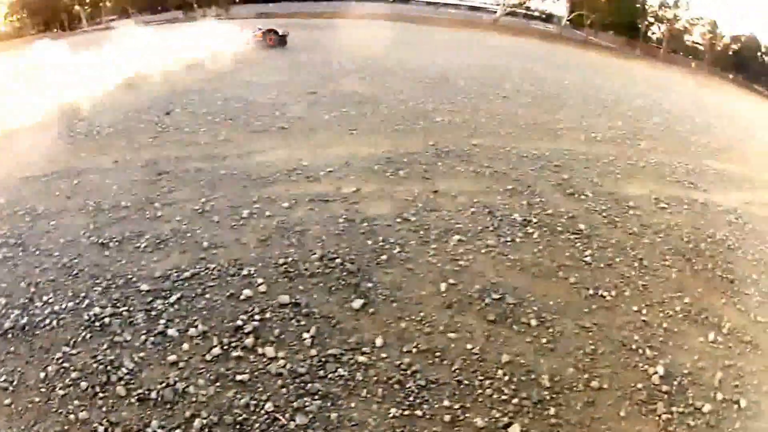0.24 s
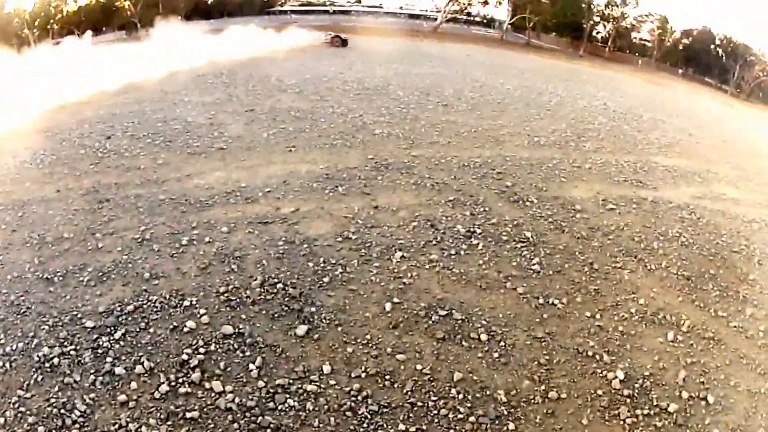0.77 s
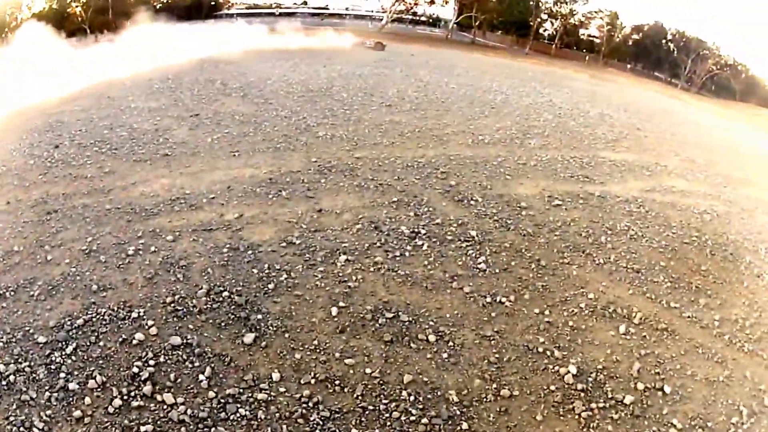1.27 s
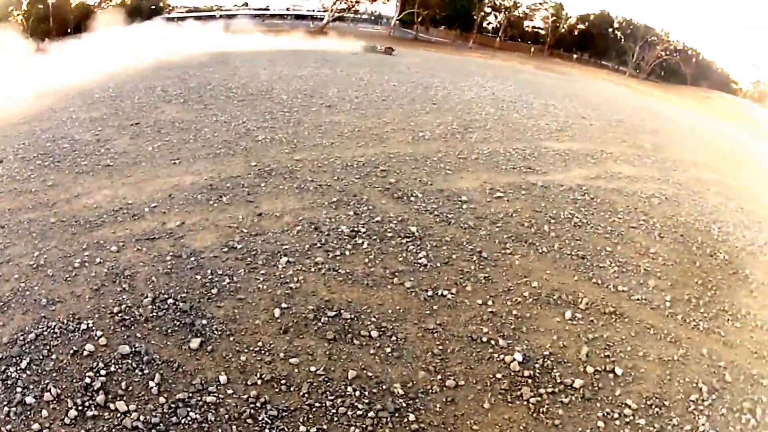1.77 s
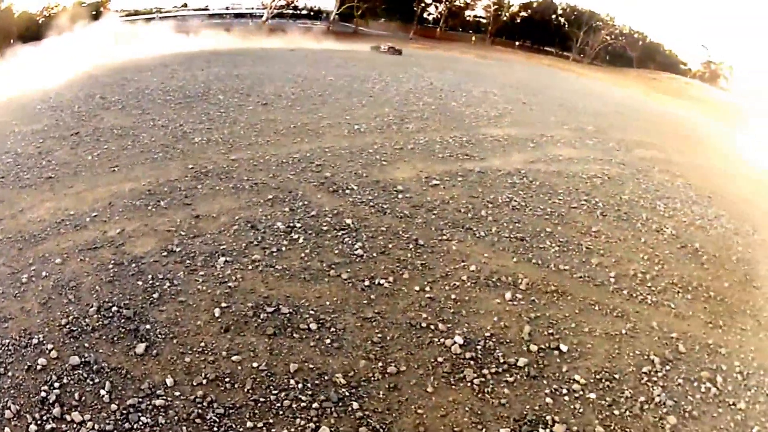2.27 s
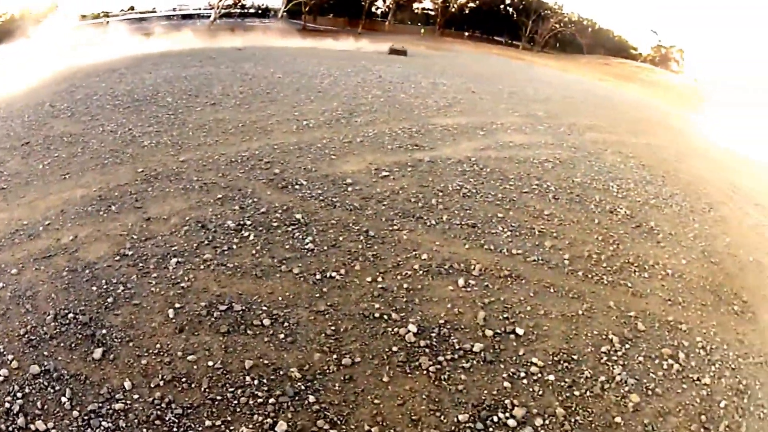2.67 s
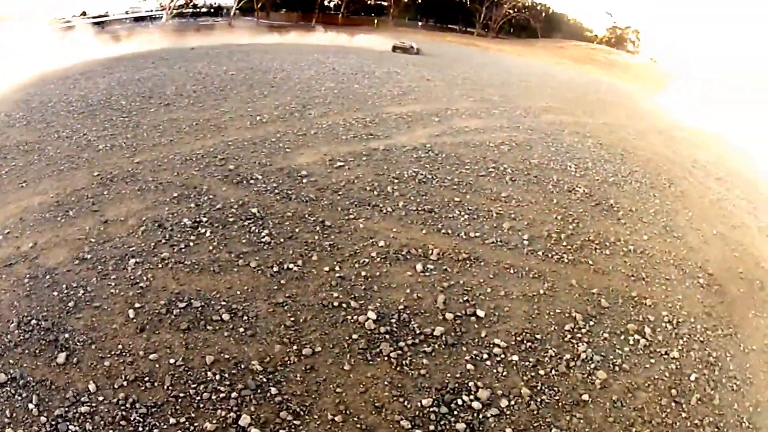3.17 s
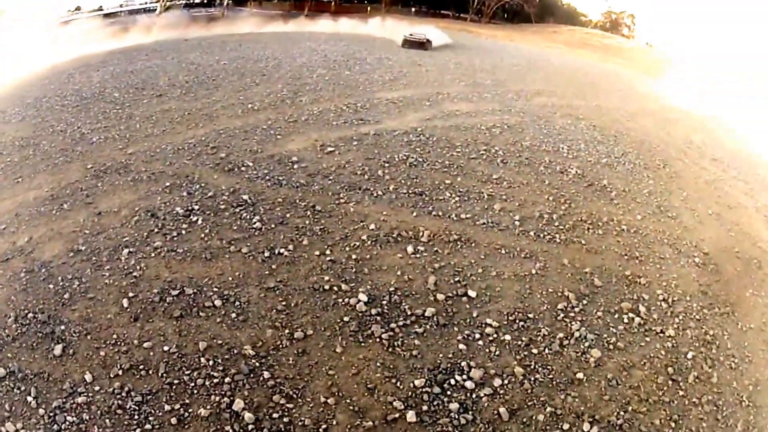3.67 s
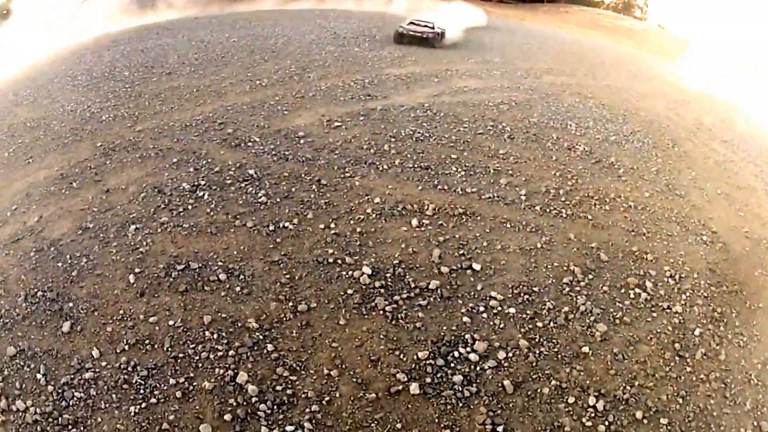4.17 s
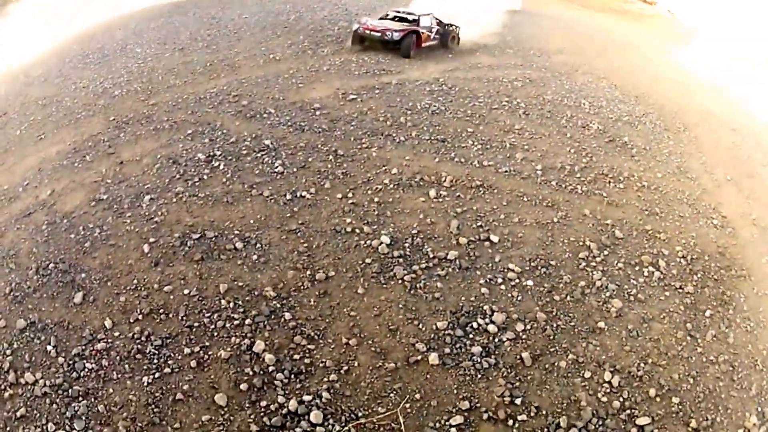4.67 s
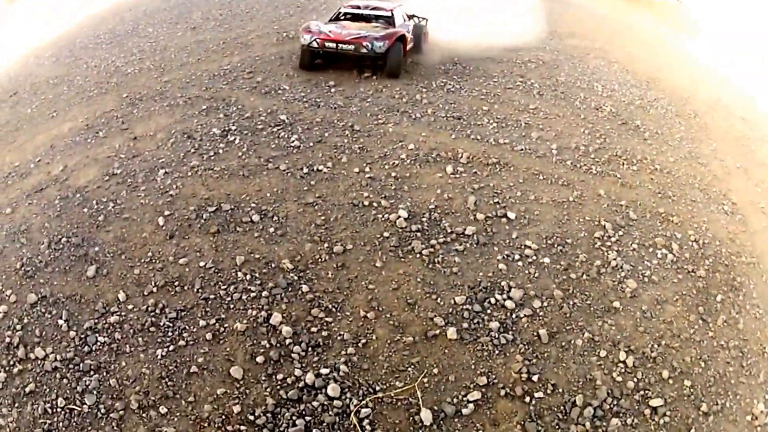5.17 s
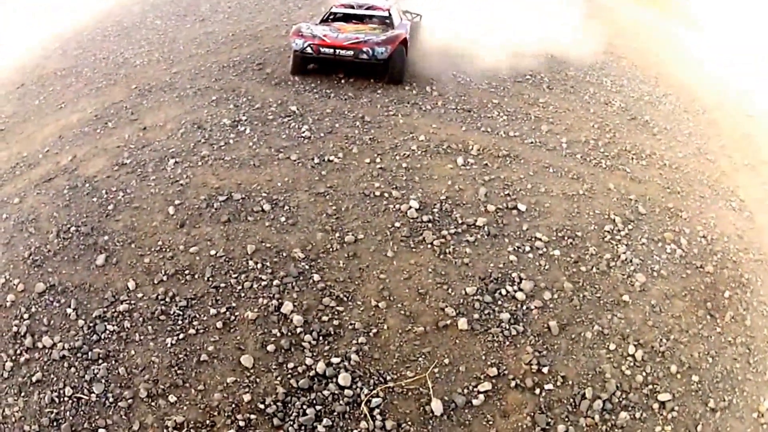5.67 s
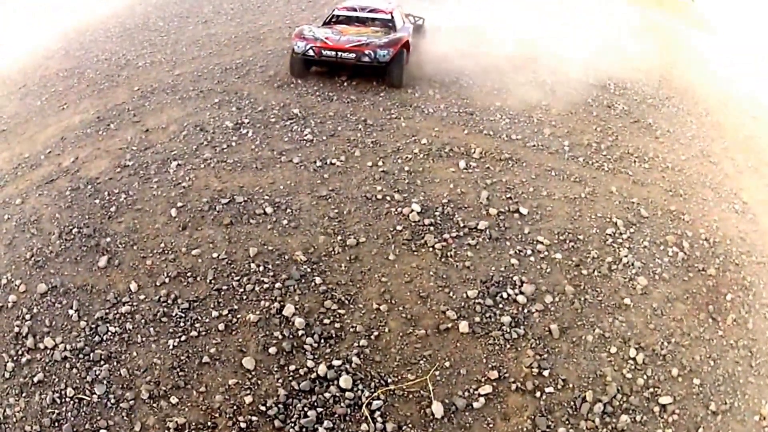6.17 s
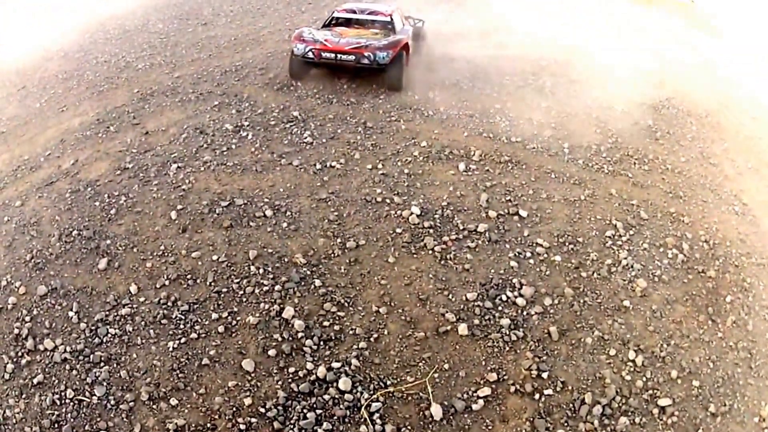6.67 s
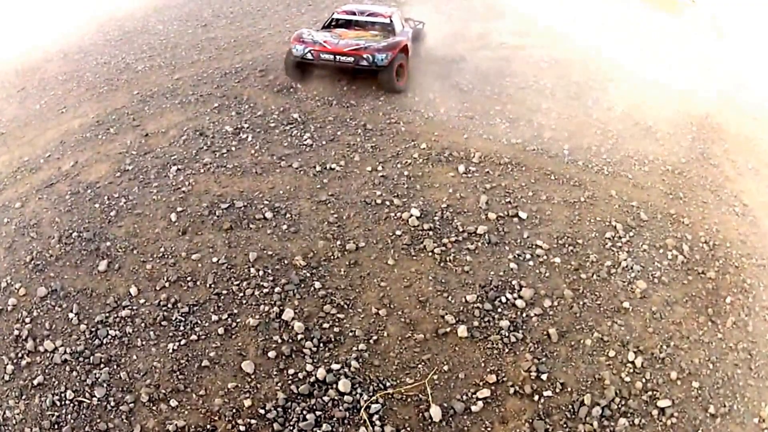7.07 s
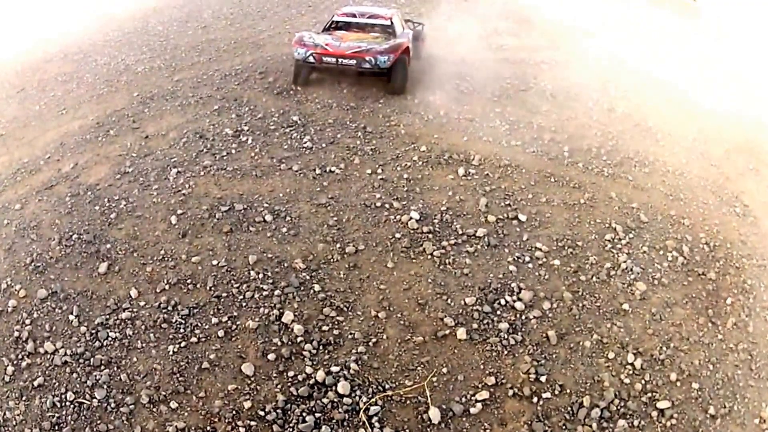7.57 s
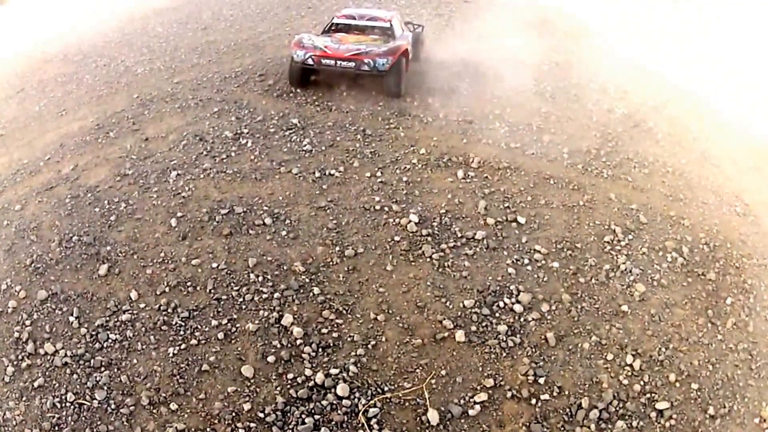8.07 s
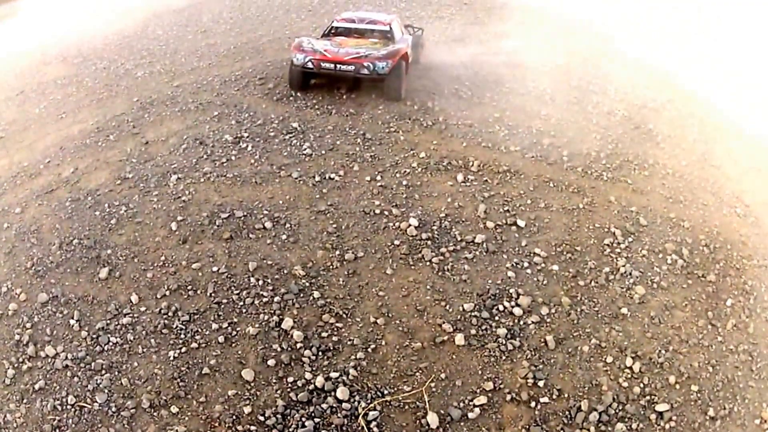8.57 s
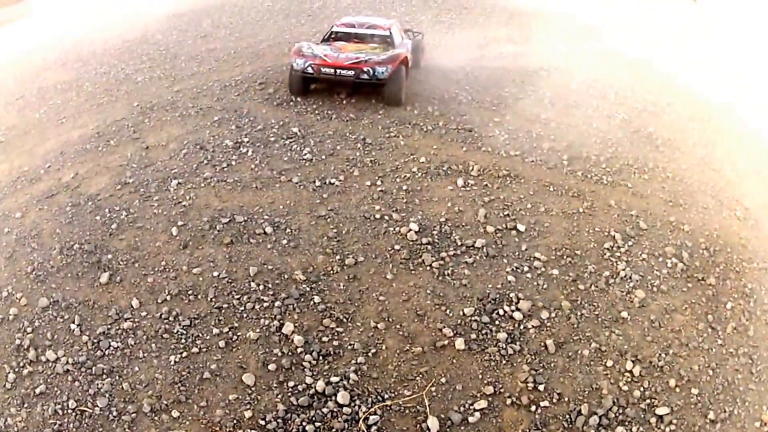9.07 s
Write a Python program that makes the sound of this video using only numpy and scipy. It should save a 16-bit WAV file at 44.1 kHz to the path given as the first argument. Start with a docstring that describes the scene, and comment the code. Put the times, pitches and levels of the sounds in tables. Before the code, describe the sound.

The small two-stroke engine of a radio-controlled truck screams at high revs from the start, close by, its tyres spraying gravel. At about 0.9 seconds the throttle shuts and the pitch falls as it coasts; a stone clinks at 1.3. Around 1.6 seconds the engine pulls again, labouring at first, then rising at about 2.4 into a wavering, raspy buzz, lower than the opening scream. Metal and gears whine, grit hisses in spurts and the frame drums softly.

At about 4 seconds the engine runs down, with another clink and a spray of grit near 4.5. From roughly 5.4 seconds to the end, just past 9, it holds a lumpy, burbling idle, with harder pops around 6.4 and 6.8, a stone clink at 7.1 and a small hiss of grit at 7.4. A thin, high sizzle colours the sound throughout, over a very faint rumble of air.

```python
"""On gravel, within arm's length of a radio-controlled truck with a two-stroke engine.
It screams, coasts, pulls again, then runs down to a lumpy idle that fires every other turn.
Each crank turn sends a pressure pulse into the resonant exhaust; the intake rasps, metal and gears
whine, the tyres spray grit, the frame drums and stones clink over a faint rumble of air.
A slow sample-and-hold mirrors the whole spectrum into a thin, high sizzle."""
import sys
import numpy as np
from scipy import signal
from scipy.fft import rfft, irfft, next_fast_len
from scipy.io import wavfile
from scipy.ndimage import uniform_filter1d, minimum_filter1d, map_coordinates

SR = 44100
rng = np.random.default_rng(int(sys.argv[2]) if len(sys.argv) > 2 else 0)


def transcribe(u):
    """Save the signal u as a 16-bit wav file named by the first command-line argument.

    u: samples, shape (n,) or (channels, n), limited to [-1, 1]; the rate is SR.
    q: integer samples, one column per channel.
    """
    v = np.clip(np.atleast_2d(u).T, -1, 1)
    q = np.round(v * 32767).astype(np.int16)
    wavfile.write(sys.argv[1], SR, q)


N = 411453
TIME = np.arange(N) / SR


def amp(db):
    """Amplitude ratio of a level in decibels."""
    return np.exp(np.asarray(db) * (np.log(10) / 20))


def unit(x):
    """Normalisation to an overall rms of 1."""
    return x / np.sqrt(np.mean(x ** 2) + 1e-20)


def steady(x, size=4096):
    """Normalisation to a running rms of 1."""
    power = uniform_filter1d(uniform_filter1d(x * x, size), size // 2)
    return x / np.sqrt(np.abs(power) + 1e-14)


def ramp(x, lo, hi):
    """Linear rise from 0 at lo to 1 at hi."""
    return np.clip((x - lo) / (hi - lo), 0, 1)


def blend(a, b, share):
    """Linear cross-fade from a to b."""
    return a + share * (b - a)


def curve(rows):
    """Linear interpolation of (time_s, value) rows at every sample."""
    return np.interp(TIME, *np.transpose(rows))


def wobble(rate_hz):
    """Slow random modulation: a spline through rate_hz Gaussian knots a second."""
    knots = rng.standard_normal(int(N * rate_hz / SR) + 4)
    coarse = np.arange(0, N, 64)
    return np.interp(np.arange(N), coarse, map_coordinates(knots, [coarse * rate_hz / SR]))


def pulses(at, sizes):
    """Impulse train, each impulse shared between the two samples round its position."""
    whole, part = at.astype(int), at % 1
    before = np.bincount(whole, sizes * (1 - part), N + 2)
    after = np.bincount(whole + 1, sizes * part, N + 2)
    return (before + after)[:N]


def ring(x, spectrum, size=4096):
    """Resonance: a minimum-phase filter through (frequency_hz, gain_db) points, falling off outside."""
    hz = np.fft.rfftfreq(size, 1 / SR) + 1
    points_hz, points_db = np.transpose(spectrum)
    beyond = np.abs(np.log(hz / np.clip(hz, points_hz[0], points_hz[-1])))
    gain = amp(np.interp(np.log(hz), np.log(points_hz), points_db) - 20 * beyond)
    cepstrum = irfft(np.log(gain + 1e-6))
    cepstrum[1:size // 2] *= 2  # folding the cepstrum makes the response causal
    cepstrum[size // 2 + 1:] = 0
    impulse_response = irfft(np.exp(rfft(cepstrum)))
    return signal.oaconvolve(np.float32(x), np.float32(impulse_response))[:N]


def filtered(x, response):
    """Filtering as multiplication of the spectrum by a function of frequency."""
    size = next_fast_len(N + SR // 10, True)
    gain = np.complex64(response(np.fft.rfftfreq(size, 1 / SR)))
    return irfft(rfft(np.float32(x), size) * gain, size)[:N]


# Bursts of throttle, each with the coast after it; the last four columns are level offsets:
# open_s, shut_s, closing_s, rest_hz, drag_hz, shut_exhaust_db, rasp_and_gears_db, gravel_db, chassis_db
THROTTLE_BURSTS = [(-.5, .905, 0.11, 80.5, 135, -5.5, -8, -2, 0.5),
                   (1.645, 3.953, 0.057, 64.53, 180.4, 1, 0.5, -0.5, 3)]


def throttle_opening(opening_s=0.019, lead_s=0.017):
    """Throttling, 0 shut to 1 open: the valve snaps open and starts to shut just before the speed drops."""
    return sum(ramp(TIME - open_s, 0, opening_s) * (1 - ramp(TIME - shut_s + lead_s, 0, closing_s))
               for open_s, shut_s, closing_s, *_ in THROTTLE_BURSTS)


def burst_db(layer, smoothing=2000):
    """Level offset of one layer in the latest burst, smoothed by a moving average."""
    rows = np.array(THROTTLE_BURSTS)
    column = 5 + ["shut_exhaust", "rasp_and_gears", "gravel", "chassis"].index(layer)
    latest = np.searchsorted(rows[:, 0], TIME) - 1
    return uniform_filter1d(rows[latest, column], smoothing)


def run_down(from_hz, rest_hz, drag_hz, t, friction_s=0.426):
    """Deceleration by linear friction and quadratic drag, which are equal at drag_hz above rest_hz."""
    excess_hz = from_hz - rest_hz
    decay = np.exp(-np.maximum(t, 0) / friction_s)
    return rest_hz + excess_hz * decay / (1 + excess_hz / drag_hz * (1 - decay))


# Crankshaft speed in the first burst, in the second and at idle: time_s, speed_hz
CRANK_SCREAMING = [(0.0, 241.6), (0.076, 237), (0.132, 240.0), (0.212, 237.2), (0.224, 240.8), (0.35, 248),
                   (0.47, 229.3), (0.492, 222.4), (0.608, 220.3), (0.642, 227.9), (0.724, 224.1),
                   (0.92, 238.5)]
CRANK_PULLING = [(1.82, 158.9), (2.11, 158.6), (2.24, 165.8), (2.34, 168.3), (2.5, 185.7), (2.53, 177.7),
                 (2.7, 186.6), (2.78, 180.3), (2.82, 185.3), (3.28, 182.9), (3.32, 184.4), (3.39, 189.7),
                 (3.49, 180), (3.56, 181.6), (3.64, 189.7), (3.76, 179.8), (3.79, 187.6), (3.94, 188.6)]
CRANK_IDLING = [(5.4, 65.03), (5.66, 62.6), (6.2, 64.38), (6.99, 64.17), (7.39, 64.94), (7.56, 63.37),
                (7.77, 61.93), (8.03, 59.55), (8.26, 61.78), (8.46, 59.0), (8.66, 61.8), (8.88, 60.56),
                (8.97, 63.1), (9.33, 65.2)]


def crankshaft(spin_up_s=0.18, idle_from_s=5.3, settle_s=0.106, flutter=0.0014, slip=0.00592,
               bounce=0.006):
    """Rotation rate in Hz sets the fundamental; wheel slip and bounce modulate its frequency."""
    speed = idle = curve(CRANK_IDLING)
    for burst, loaded in zip(THROTTLE_BURSTS, (CRANK_SCREAMING, CRANK_PULLING)):
        open_s, shut_s, _, rest_hz, drag_hz, *_ = burst
        spin_up = np.sin(np.pi / 2 * ramp(TIME - open_s, 0, spin_up_s)) ** 2
        speed = blend(speed, curve(loaded), spin_up)
        coasting = run_down(speed[int(shut_s * SR)], rest_hz, drag_hz, TIME - shut_s)
        speed = np.where(TIME < shut_s, speed, coasting)
    speed = blend(speed, idle, ramp(TIME - idle_from_s, 0, settle_s))
    racing = ramp(speed, 157.4, 185)
    return speed * (1 + (flutter + slip * racing) * wobble(45) + bounce * racing * wobble(22))


def strokes(speed, turns, scatter_db=0.37, jitter_s=6e-6, idle_jitter_s=8e-5, max_turns=2000):
    """Cyclic variation: sample position and size of each turn's puff; slow turns come less evenly."""
    at = np.interp(np.arange(1, int(turns[-1])), turns, np.arange(N))
    timing, strength = rng.standard_normal((max_turns, 2))[:len(at)].T
    uneven_s = jitter_s + idle_jitter_s * (1 - ramp(speed[at.astype(int)], 83, 120))
    return np.clip(at + uneven_s * SR * timing, 0, N - 1), amp(scatter_db * strength)


def on_pipe(speed, lo_hz=165, hi_hz=177):
    """Pipe tuning: 0 while the engine labours, 1 once it is fast enough for the tuned pipe to work."""
    return ramp(speed, lo_hz, hi_hz)


# Spectrum of one exhaust pulse under load, from low speed to high: frequency_hz, gain_db
PULLING_PULSE = [(100, -11.5), (160, -10.5), (320, 0), (470, 2.5), (630, 8.5), (690, -1), (780, -18.5),
                 (840, -10.5), (950, -18.5), (1100, -21), (1260, -15), (1430, -42.5), (1600, -32),
                 (1800, -46), (2100, -24.5), (3000, -48)]
ON_PIPE_PULSE = [(100, -38), (183, 13.5), (370, 23), (520, 15.5), (580, 27), (750, 19), (950, 14.5),
                 (1080, -16.5), (1280, -12.5), (1470, -10), (1700, -27), (2550, -40), (3200, -51),
                 (5500, -58.5)]
SCREAMING_PULSE = [(120, -39), (225, -9.5), (440, 5.5), (495, 4), (660, 1), (725, -18), (880, -26),
                   (970, -17.5), (1100, -26), (1200, -12.5), (1380, -33.5), (1680, -35), (2080, -39),
                   (2400, -41), (4500, -52)]


def open_exhaust(speed, puffs, pulling_db=-12.5, screaming_db=-11):
    """Source and filter: under load the puffs excite pipe resonances that change with engine speed."""
    pull, pipe, scream = [steady(ring(puffs, spectrum))
                          for spectrum in (PULLING_PULSE, ON_PIPE_PULSE, SCREAMING_PULSE)]
    screaming = ramp(speed, 198, 213)
    tone = blend(blend(pull, pipe, on_pipe(speed)), scream, screaming)
    return amp(blend(pulling_db, screaming_db, screaming)) * steady(tone)


# Spectrum of piston and intake noise: frequency_hz, gain_db
INTAKE_SPECTRUM = [(500, -19), (900, 13), (1180, -33), (1420, 4), (1800, 1), (2300, 3), (2650, -2),
                   (3000, -2.5), (3300, -14.5), (3750, -9), (4150, -20), (5200, -15), (6000, -54.5)]


def rasp(speed, wheels, turns, throttle, puffs, base_db=-47, engine_db_per_hz=0.0421,
         wheel_db_per_hz=0.0539, labouring_db=-12, on_pipe_db=-5.5):
    """Amplitude modulation: piston and intake noise swells once a turn, and under load becomes a buzz."""
    swell = 1 + 0.12 * np.cos(2 * np.pi * (turns - 0.15))
    noise = unit(ring(swell * rng.standard_normal(N), INTAKE_SPECTRUM))
    buzz = steady(ring(-puffs, INTAKE_SPECTRUM))  # the intake sucks as the exhaust blows
    buzz_share = 0.65 * throttle
    speed_db = engine_db_per_hz * speed + wheel_db_per_hz * wheels
    load_db = throttle * blend(labouring_db, on_pipe_db, on_pipe(speed))
    db = base_db + speed_db + load_db + burst_db("rasp_and_gears") + 0.37 * spurt_db() + wobble(40)
    return amp(db) * (np.sqrt(1 - buzz_share) * noise + np.sqrt(buzz_share) * buzz)


# Resonances of the cooling fins and gear case: frequency_hz, gain_db
METAL_MODES = [(2200, -10.5), (2500, 1), (2570, 17.5), (2650, 8.5), (3000, -31), (3490, -28), (4050, -49),
               (4600, 8), (4850, -21), (5130, -0.5), (5600, -24.5)]


def whine(speed, throttle, puffs, labouring_db=-54, on_pipe_db=-42, flicker_db=2):
    """Forced vibration: under load the firings drive the modes of the engine's metal."""
    db = blend(labouring_db, on_pipe_db, on_pipe(speed)) + flicker_db * wobble(11)
    return steady(ring(puffs, METAL_MODES)) * throttle * amp(db)


# Share of the engine speed that the clutch passes to the wheels: time_s, grip_ratio
CLUTCH_GRIP = [(1.12, 1), (1.45, 0.17), (1.65, 0.15), (1.87, .58), (2.25, 0.96), (4.5, 0.94), (5.6, 0)]


def clutch(speed):
    """Friction coupling: the wheel drive turns at a share of the engine speed, in Hz."""
    return speed * np.clip(curve(CLUTCH_GRIP), 0, 1)


def gears(speed, wheels, throttle, teeth=19, base_db=-50, slipping_db=1, overrun_db=9, flutter=0.033,
          flicker_db=5):
    """Gear mesh: an unsteady tone at the tooth-passing rate, strongest as the wheels push the engine."""
    mesh_hz = teeth * wheels * (1 + flutter * wobble(400))
    cycles = np.cumsum(mesh_hz) / SR
    strain_db = blend(overrun_db, slipping_db * (1 - wheels / speed), throttle)
    db = base_db + strain_db + burst_db("rasp_and_gears") + flicker_db * wobble(25)
    return amp(db) * ramp(speed, 95, 155) * np.sin(2 * np.pi * cycles)


# The tyres bite and throw a spurt of grit: centre_s, offset_db
GRIT_SPURTS = [(0.218, 4.5), (0.451, 6.5), (1.08, 3.5), (2.48, -3), (2.702, 1.5), (3.468, 5.5),
               (3.732, 5.5), (4.461, 11), (6.722, 3.5), (7.42, 10)]


def spurt_db(width_s=0.06):
    """Traction: each bite of the tyres shifts the level along a Gaussian curve."""
    return sum(db * np.exp(-0.5 * ((TIME - centre_s) / width_s) ** 2) for centre_s, db in GRIT_SPURTS)


# Spectrum of flying grit: frequency_hz, gain_db
GRIT_SPECTRUM = [(1000, -11.5), (2500, -23.5), (3200, -1.5), (3550, -0.5), (4100, -16.5), (4600, 3.5),
                 (5200, -1.5), (5600, -8), (6000, -28.5)]


def gravel(wheels, turns, crawl_db=-66, fast_db=-47.5, fast_hz=180, flicker_db=2, count=2500):
    """Random impacts: thrown grit merges into a hiss that grows with wheel speed; single stones tick."""
    stone_at = rng.uniform(0, N - 1, count)
    stones = pulses(stone_at, amp(5 * np.minimum(rng.exponential(size=count), 4)))
    grit = rng.standard_normal(N) * (1 + 0.13 * np.cos(2 * np.pi * (turns - 0.2)))
    speed_db = blend(crawl_db, fast_db, ramp(wheels, 0, fast_hz) ** 2)
    db = speed_db + spurt_db() + burst_db("gravel") + flicker_db * wobble(16)
    return unit(ring(grit + 0.47 * unit(stones), GRIT_SPECTRUM)) * amp(db)


# Response of the truck's frame: frequency_hz, gain_db
FRAME_SPECTRUM = [(25, -42), (70, -18), (140, -6.5), (300, -4), (480, -4.5), (680, 0.5), (850, -16),
                  (1100, -19.5), (1600, -32), (2500, -58)]


def chassis(speed, wheels, throttle, standing_db=-35, rolling_db=-26, rolling_hz=90, labouring_db=-13,
            on_pipe_db=-4, lumps_db=2):
    """Structure-borne sound: bumps and engine shake drum through the frame, most when rolling freely."""
    speed_db = blend(standing_db, rolling_db, ramp(wheels, 0, rolling_hz))
    load_db = throttle * blend(labouring_db, on_pipe_db, on_pipe(speed))
    bumps = rng.standard_normal(N) * amp(lumps_db * wobble(45))
    return unit(ring(bumps, FRAME_SPECTRUM)) * amp(speed_db + load_db + burst_db("chassis"))


# Spectrum of air moving round a closed housing: frequency_hz, gain_db
AIR_SPECTRUM = [(25, -13.5), (55, -10), (120, -33)]


def air_rumble(level_db=-62):
    """Flow noise: moving air makes a faint, steady rumble."""
    return amp(level_db) * unit(ring(rng.standard_normal(N), AIR_SPECTRUM))


# Spectrum of one exhaust pulse with the throttle shut, fast and slower: frequency_hz, gain_db
OVERRUN_PULSE = [(120, -17.5), (170, -8), (300, -11), (420, -18.5), (490, -3.5), (560, 6), (690, -3),
                 (760, -9.5), (850, -30), (1100, -27.5), (1400, -25.5), (2700, -47.5), (4000, -47)]
COASTING_PULSE = [(70, -19.5), (130, -12), (190, -14), (310, -5.5), (360, -5.5), (430, 1), (510, 7),
                  (600, -3.5), (690, 0), (770, -10.5), (870, -42), (1080, -55), (1400, -56.5), (2500, -43)]
# The exhaust swells at speeds whose overtones meet the silencer's note: speed_hz, level_db
SHUT_SWELL = [(64, -13.5), (76, -13), (88, -13.5), (100, -14.5), (121, -17.5), (142, -14.5), (160, -13.5),
              (185, -28.5)]


def shut_exhaust(speed, puffs, idle):
    """Swept resonance: as the engine slows, the pipe's tone passes from overrun to coasting to idle."""
    overrun = steady(ring(puffs, OVERRUN_PULSE))
    coast = steady(silencer(ring(puffs, COASTING_PULSE), centre_hz=494, width_hz=100))
    slow = blend(idle, coast, ramp(speed, 65, 82.7))
    tone = blend(slow, overrun, ramp(speed, 114.5, 122))
    db = np.interp(speed, *np.transpose(SHUT_SWELL)) + burst_db("shut_exhaust")
    return amp(db) * steady(tone)


def silencer(x, centre_hz, width_hz):
    """Group delay: the chamber, an all-pass resonator, stores part of each puff and lets it out later."""
    radius = np.exp(-np.pi * width_hz / SR)
    denominator = [1, -2 * radius * np.cos(2 * np.pi * centre_hz / SR), radius * radius]
    return signal.lfilter(denominator[::-1], denominator, x)


# Stones striking the body: start_s, level_db, pitch_hz
STONE_STRIKES = [(1.255, -34.5, 2600), (1.6018, -52, 3670), (4.1208, -39.5, 2963), (7.1258, -33.5, 2902)]


def clinks(t60_s=0.084, gain_db=-1):
    """Damped free vibration: each stone's impact leaves a short, rough ring that decays exponentially."""
    out = np.zeros(N + SR)
    t = np.arange(SR // 10) / SR
    for start_s, level_db, pitch_hz in STONE_STRIKES:
        tone = np.sin(2 * np.pi * pitch_hz * t) + 0.4 * rng.standard_normal(len(t))
        out[round(start_s * SR):][:len(t)] += amp(level_db + gain_db - 60 * t / t60_s) * tone
    return out[:N]


# Unusually hard firings at idle: time_s, extra_db
HARD_BANGS = [(6.428, 5), (6.771, 6), (7.672, 0.5), (9.297, 2)]


def firings(at, scatter_db=3.5, slip_chance=0.05):
    """Four-stroking: bang sizes at idle, where every other turn fires and the pattern sometimes slips."""
    slips = np.cumsum(rng.random(len(at)) < slip_chance)
    fires = (np.arange(len(at)) + slips) % 2
    sizes = fires * amp(scatter_db * rng.standard_normal(len(at)))
    for time_s, extra_db in HARD_BANGS:
        turn = np.argmin(np.abs(at - time_s * SR))
        sizes[turn - 1:turn + 2] = 0  # the turns on either side only fill the cylinder
        sizes[turn] = amp(extra_db)
    return sizes


# Spectra at idle of the soft puff, the bang and the crack that opens it: frequency_hz, gain_db
IDLE_PULSE = [(60, -15), (125, -13), (190, 1), (320, 5.5), (410, -1), (490, 11), (530, 4), (578, 6),
              (640, -16.5), (700, 3.5), (770, -12.5), (830, -25.5), (1050, -57.5), (1250, -46)]
BANG_SPECTRUM = [(60, -45.5), (100, -4), (150, -43.5), (220, -6), (300, 6.5), (410, 0), (485, 9.5),
                 (600, 2), (740, -2.5), (850, -35.5), (1070, -21.5), (1180, -47), (3000, -81.5)]
CRACK_SPECTRUM = [(200, -12), (380, 2), (560, 3), (760, 3), (1000, -31.5), (1400, -50.5), (2000, -34),
                  (2300, -21.5), (2600, -48.5), (3300, -49), (4200, -58.5)]


def idle_exhaust(at, puffs, burnt_share=0.22, bang_share=0.6, crack_db=-12):
    """Impulsive combustion: a turn that fires trades part of its soft puff for a sharp bang."""
    bangs = pulses(at, firings(at))
    burble = silencer(ring(puffs - burnt_share * bangs, IDLE_PULSE), centre_hz=510, width_hz=85)
    body = steady(burble + bang_share * ring(bangs, BANG_SPECTRUM))
    return body + amp(crack_db) * steady(ring(bangs, CRACK_SPECTRUM))


def scene():
    """Superposition of engine, gears, tyres, frame and air in one channel."""
    speed = crankshaft()
    turns = np.cumsum(speed) / SR
    throttle = throttle_opening()
    wheels = clutch(speed)
    at, sizes = strokes(speed, turns)
    puffs = pulses(at, sizes)
    idle = idle_exhaust(at, puffs)
    exhaust = blend(shut_exhaust(speed, puffs, idle), open_exhaust(speed, puffs), throttle)
    engine = exhaust + rasp(speed, wheels, turns, throttle, puffs) + whine(speed, throttle, puffs)
    truck = gears(speed, wheels, throttle) + gravel(wheels, turns) + chassis(speed, wheels, throttle)
    return (engine + truck + clinks() + air_rumble())[None]


def limiter(x, ceiling=0.95, size=220):
    """Peak limiting: the gain ducks smoothly around peaks that would overload."""
    needed = np.minimum(1, ceiling / (np.abs(x) + 1e-9))
    return x * uniform_filter1d(minimum_filter1d(needed, 2 * size), size)


def record(dry, hold_hz=12000, mirror_db=-0.8, faint_mirror_hz=8100, faint_mirror_db=-23, top_hz=15750):
    """Spectral imaging: sample-and-hold mirrors the sound about its rate, and faintly about 8.1 kHz."""
    fade = np.minimum(1, np.minimum(TIME, TIME[-1] - TIME) / 0.004)
    sound = filtered(limiter(dry[0]) * fade, lambda hz: np.clip((hold_hz / 2 - hz) / 400, 0, 1))
    carriers = amp(mirror_db) * np.cos(2 * np.pi * hold_hz * TIME)
    carriers += amp(faint_mirror_db) * np.cos(2 * np.pi * faint_mirror_hz * TIME)
    steps = 2 * carriers * filtered(sound, lambda hz: 1j * hz)  # steps grow with the slope of the wave
    mirrors = filtered(steps, lambda hz: -1j / np.maximum(hz, hold_hz / 2))
    return filtered(sound + mirrors, lambda hz: hz < top_hz)[None]


dry = scene()
out = record(dry)
transcribe(out)
```